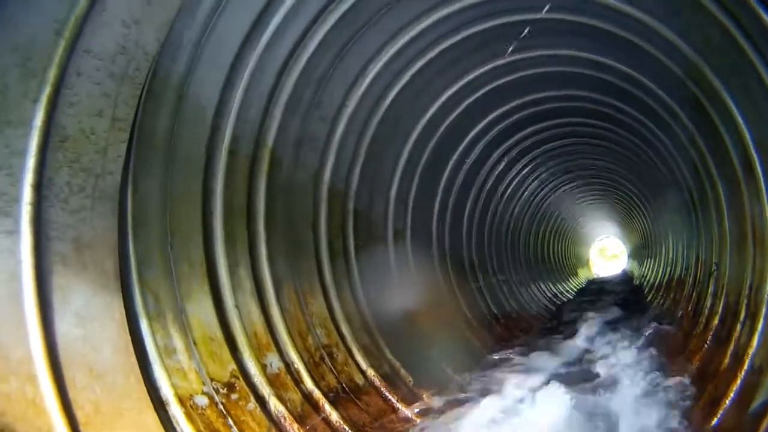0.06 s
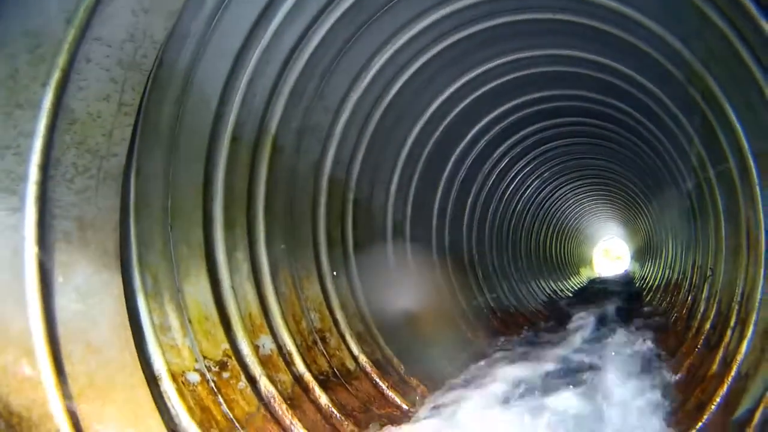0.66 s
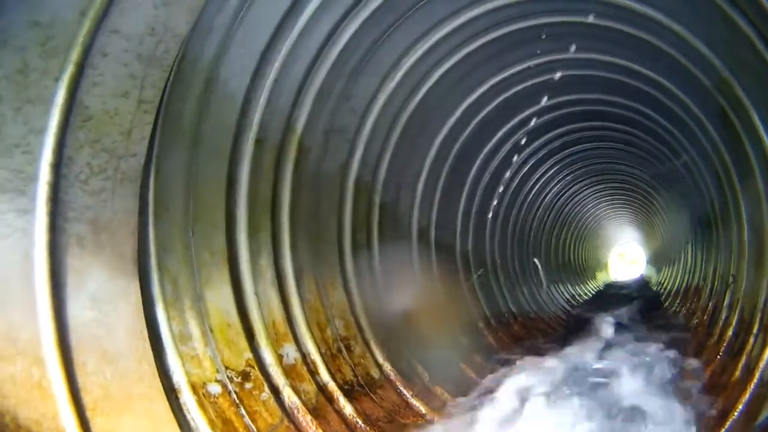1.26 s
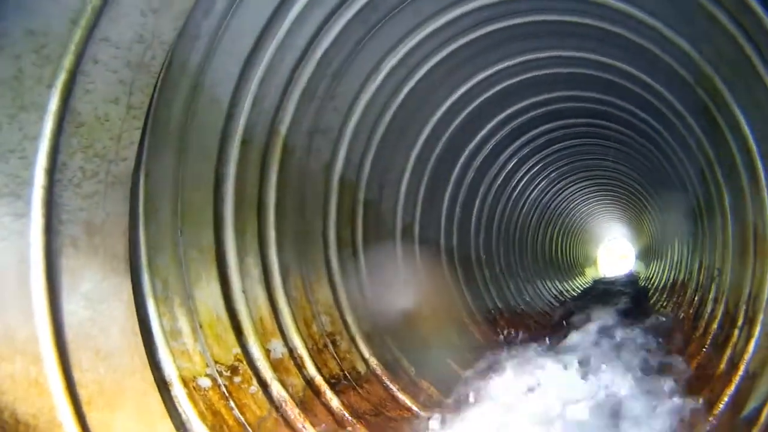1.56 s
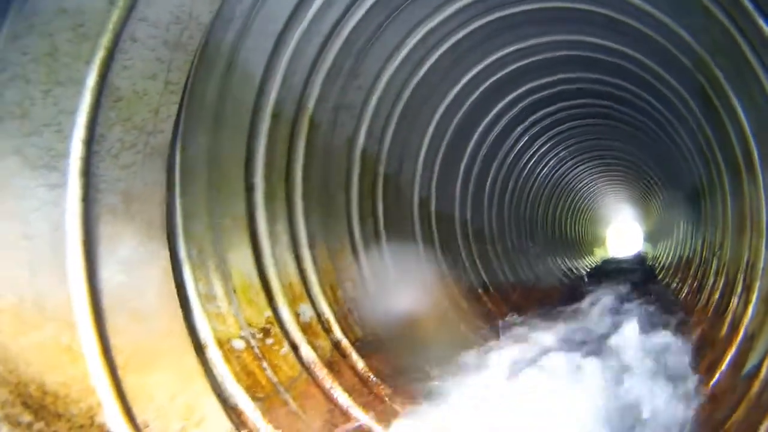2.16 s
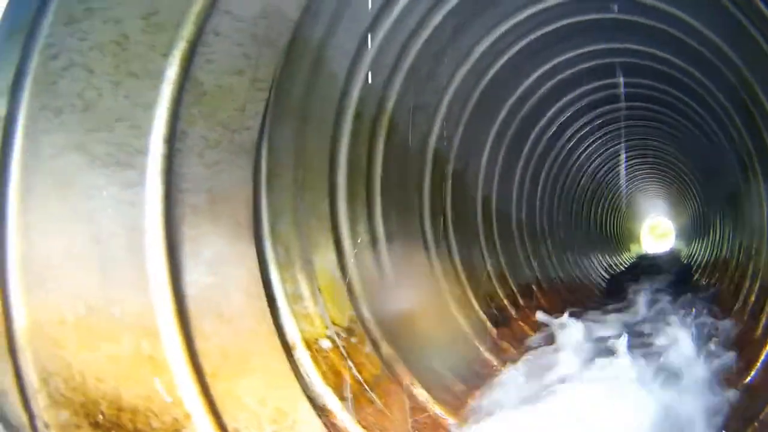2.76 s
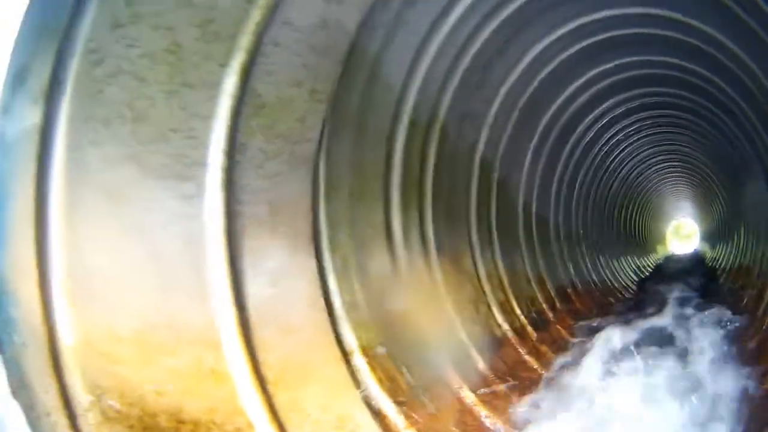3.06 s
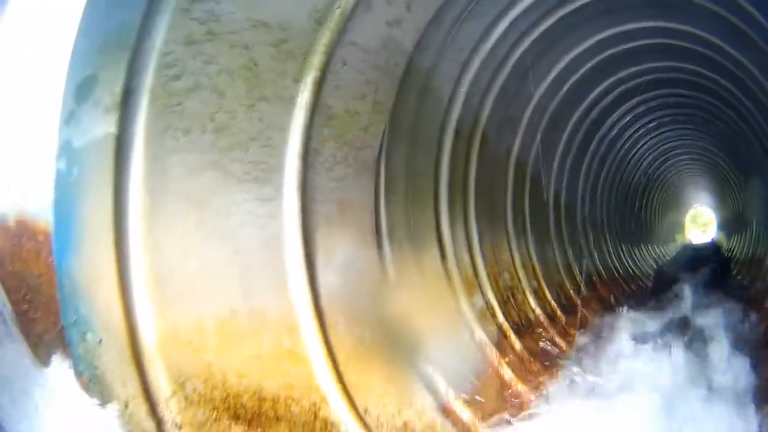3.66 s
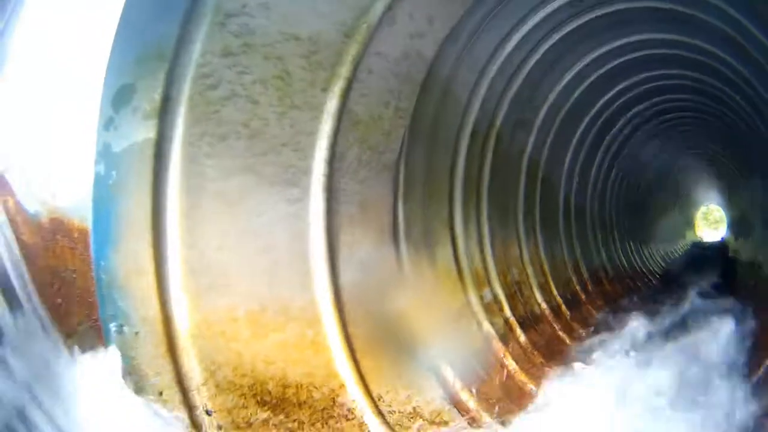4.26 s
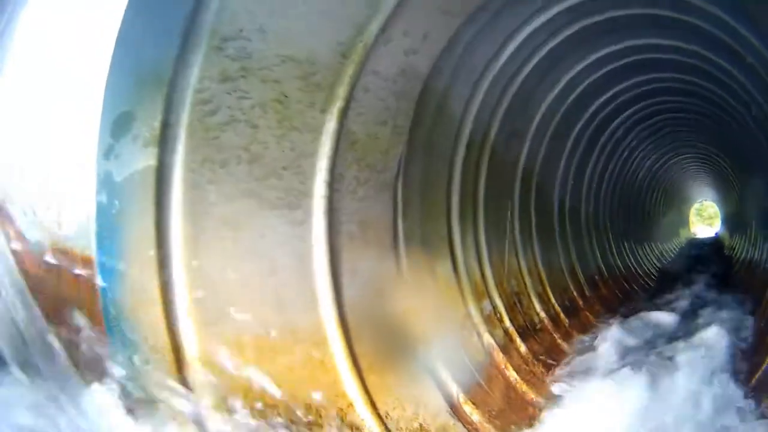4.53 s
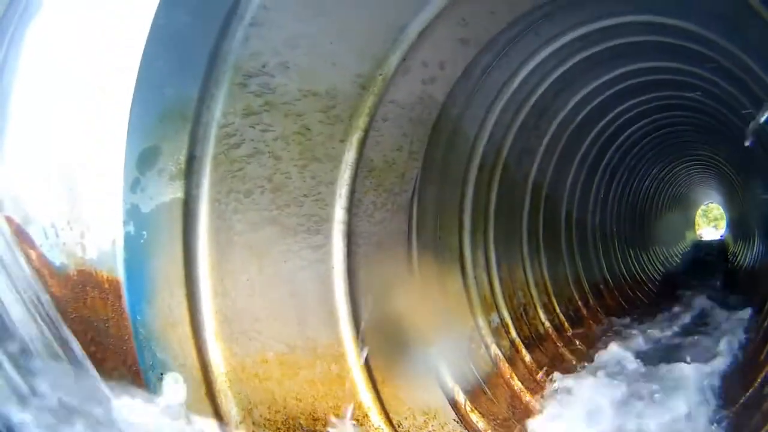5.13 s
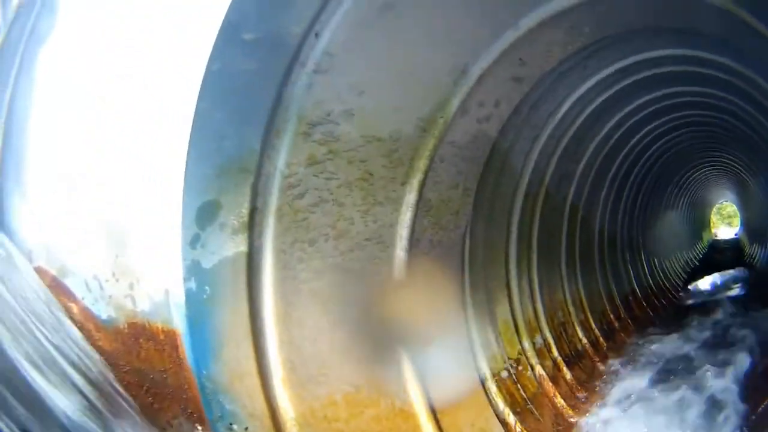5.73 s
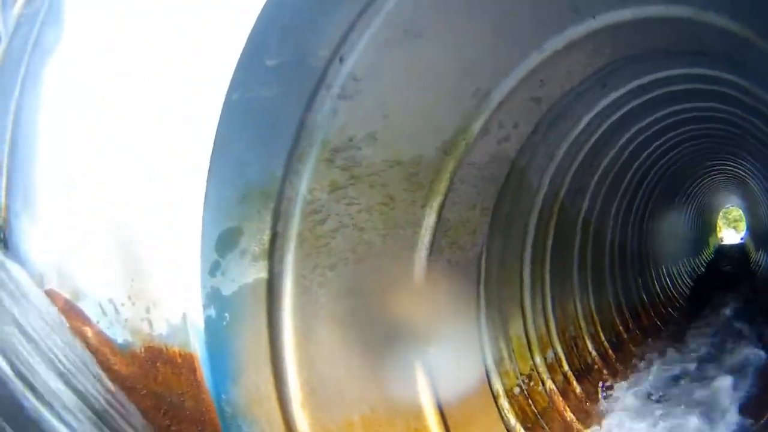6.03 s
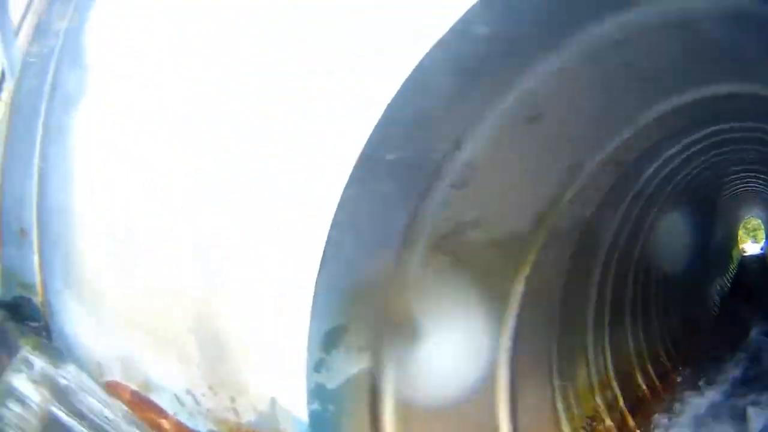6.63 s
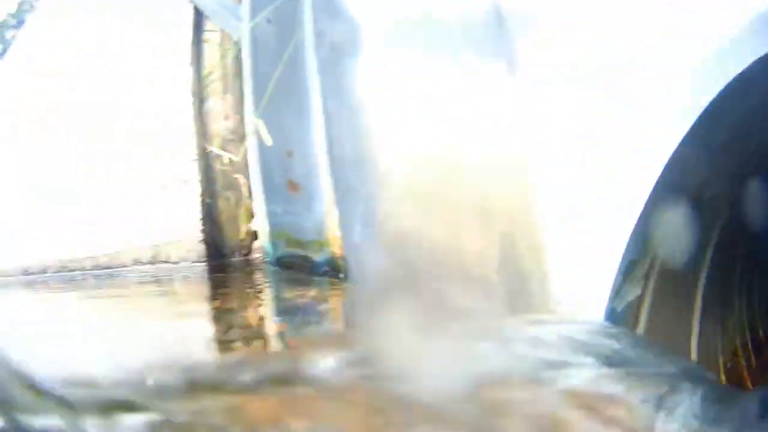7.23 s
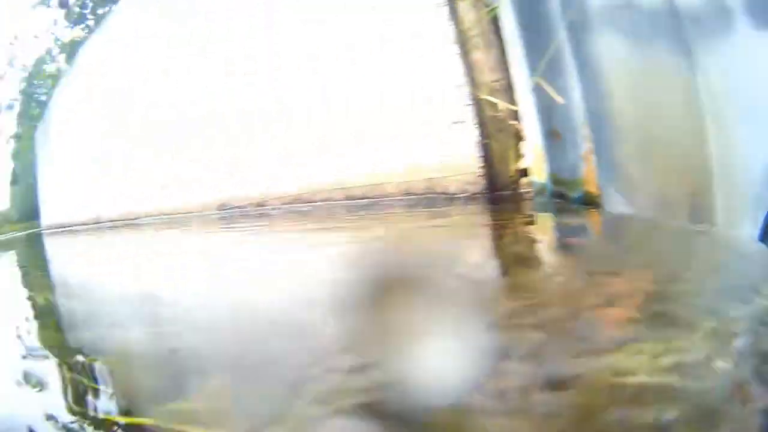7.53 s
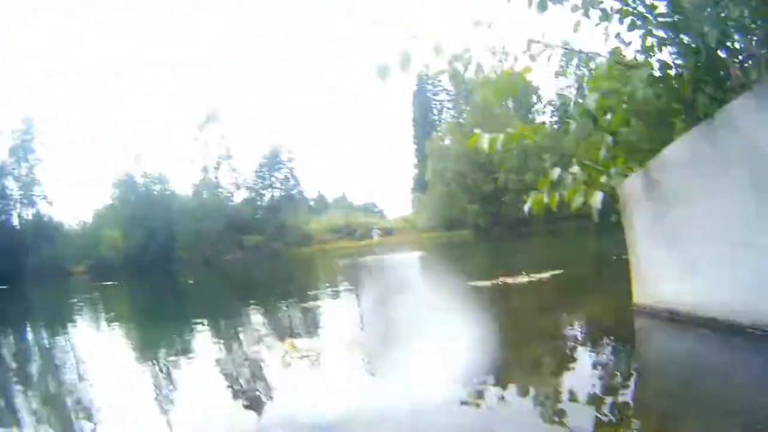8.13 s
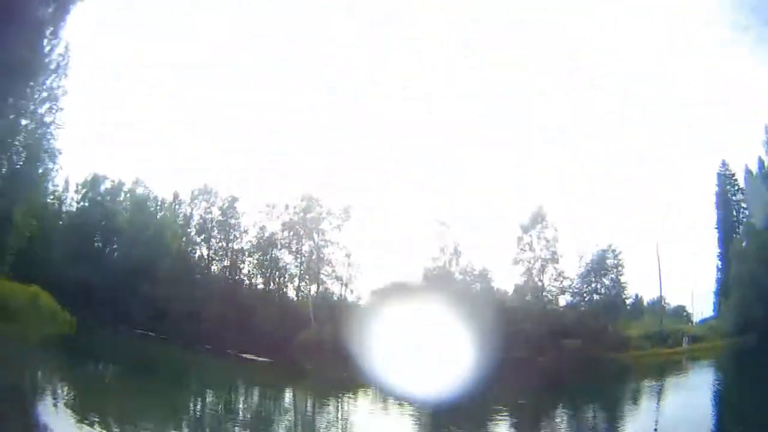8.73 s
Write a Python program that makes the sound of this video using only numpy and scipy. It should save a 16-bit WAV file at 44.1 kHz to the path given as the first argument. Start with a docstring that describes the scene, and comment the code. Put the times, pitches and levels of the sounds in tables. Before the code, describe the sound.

Heard close up at the mouth of a drain pipe outdoors, a steady, fizzing rush of water is dotted with drips ticking on the camera case. Falling water then slops and crackles over the microphone, with sharp pops and pinging bubbles. The splashing eases and gives way to short gulps and burbles in a pond. Finally the flow sounds far away, leaving dull finger taps and a faint handling rumble.

```python
"""Water rushes out of a corrugated metal culvert (a drain pipe) into a pond: countless tiny bubbles ring.
Drops tap the case of a small waterproof camera held at the pipe's mouth. It moves into the falling
water, where spray and bubbles burst right at the microphone and overload it. Then it dips through
the gurgling pond surface and turns away from the rush, while fingers knock on the case."""
import sys
import numpy as np
from scipy import signal
from scipy.fft import rfft, irfft, next_fast_len
from scipy.io import wavfile

SR = 44100
rng = np.random.default_rng(int(sys.argv[2]) if len(sys.argv) > 2 else 0)


def digitize_waveform(pressure):
    """Quantize a signal to 16-bit integers and store it at the path in sys.argv[1].

    Rows of a 2-D input are taken as channels; values are limited to [-1, 1].
    """
    field = np.atleast_2d(pressure).T
    bounded = np.clip(field, -1, 1)
    quanta = np.round(bounded * 32767).astype(np.int16)
    wavfile.write(sys.argv[1], SR, quanta)


N = 387638

# Levels in all tables are relative. A "colour" says how strong each pitch is.
# water slops against the case: t/s, length/s, spray level/dB, burble level/dB, burble f/Hz
SLOPS = [(3.522, 0.12, -42, -37.5, 2350), (3.67, 0.029, -39, -45, 2600), (3.897, 0.043, -31, -32, 3030),
         (3.959, 0.066, -27.5, -28, 2240), (4.109, 0.13, -36.5, -40, 4400), (4.374, 0.037, -33, -29, 2900),
         (4.419, 0.035, -34.5, -31, 4130), (4.474, 0.045, -31.5, -25, 2100), (4.544, 0.042, -34, -28, 2280),
         (4.635, 0.028, -31, -25.5, 2310), (4.684, 0.026, -42, -36, 2160), (4.733, 0.11, -45, -30, 2780),
         (4.862, 0.0064, -34.5, -27, 2360), (5.012, 0.0073, -47, -26, 1820),
         (5.058, 0.017, -52, -29.5, 1970), (5.105, 0.022, -32.5, -30, 2020),
         (5.147, 0.051, -39.5, -32, 1890), (5.236, 0.075, -36, -36, 2390), (5.321, 0.036, -42, -26.5, 2910),
         (5.616, 0.045, -31.5, -44, 3860), (5.738, 0.02, -35.5, -29, 3000),
         (5.887, 0.24, -43.5, -35.5, 1970)]
# the notes the case rings with: f/Hz, level/dB, time to fade by 60 dB/s
CASE_NOTES = [(401, 5, 0.063), (497, 3, 0.038), (703, 11, 0.043), (767, 3.5, 0.024), (954, 6, 0.02),
              (1520, -3.5, 0.044)]
# fine spray: f/Hz, level/dB
SPRAY_COLOUR = [(3000, 6), (4200, 5), (5400, 4.5), (6800, 1), (8500, -18.5), (11000, -35), (14000, -39)]
# small pinging bubbles: f/Hz, level/dB
PING_COLOUR = [(3900, 5.5), (5200, -3), (6400, -2), (7400, -1), (9000, -24)]


def culvert():
    """Countless far bubbles merge into a rush with a fine fizz, over the low churn of the stream."""
    # water in the pipe: t/s, rush level/dB, churn level/dB
    flow = [(0.0, -33.5, -54), (1.56, -33, -53), (2.19, -33.5, -55.5), (3.43, -34, -52), (4.02, -28.5, -43),
            (5.21, -29.5, -45.5), (6.16, -33, -48.5), (6.77, -35, -56.5), (7.04, -34.5, -54),
            (7.21, -36.5, -42.5), (7.46, -37, -52), (7.7, -43, -54), (7.92, -46.5, -64.5),
            (8.2, -53.5, -64.5), (8.6, -83, -73), (8.75, -46.5, -52)]
    # the bright rush: f/Hz, level/dB
    rush_colour = [(1100, -25.5), (1500, 7), (1900, -0.5), (2300, -0.5), (2650, 13.5), (3150, -11),
                   (3900, 10.5), (5000, 0), (6800, 0), (8500, -10.5), (11000, -17.5), (14500, -86)]
    # the low churn: f/Hz, level/dB
    churn_colour = [(150, -17), (280, -9), (420, -2), (550, -3), (750, 3), (1100, 9.5), (1500, 13.5),
                    (2200, -45.5)]
    rush_db, churn_db = in_time(flow)
    rush = restless_noise(rush_colour, surge_db=1.02, flicker_db=1.43, flicker_hz=23)
    fizz = bubble_cloud(SPRAY_COLOUR, per_s=1500, cycles=11.8, size_db=5, clump_db=1.5, pitches=16)
    churn = restless_noise(churn_colour, surge_db=-1.5, flicker_db=3, flicker_hz=15)
    return from_db(rush_db - 5) * rush + from_db(rush_db - 11.5) * fizz + from_db(churn_db + 3) * churn


def falling_water():
    """Each slop of water breaks into sizzle, crackle, a few pings and a burble of larger bubbles."""
    # bursting spray: f/Hz, level/dB
    crackle_colour = [(2500, 13), (5000, 0), (7000, -17), (9000, -11), (12500, -12.5)]
    rise_s = 0.021
    spray_gain, burble_gain = swells([row[:-1] for row in SLOPS], rise_s, fade_s=0.0024)
    sizzle = bubble_cloud(SPRAY_COLOUR, per_s=950, cycles=25, size_db=5, clump_db=5, pitches=36)
    crackle = bubble_cloud(crackle_colour, per_s=600, cycles=10, size_db=4.5, clump_db=4, pitches=16)
    pings = bubble_cloud(PING_COLOUR, per_s=300, cycles=20, size_db=3, clump_db=2, pitches=24)
    spray = from_db(-1.5) * sizzle + from_db(-5.5) * crackle + pings
    return spray_gain * spray + from_db(-7) * burble_gain * slop_burble(rise_s)


def slop_burble(rise_s, per_s=380, cycles=23, pitch_spread=0.157):
    """Larger bubbles ring at random pitches close to that of the latest slop."""
    slop_times, *_, slop_hz = np.transpose(SLOPS)
    births = np.flatnonzero(rng.random(N) < per_s / SR)
    scatter, size_db, phases = rng.standard_normal((N, 3))[births].T
    latest = np.maximum(np.searchsorted(slop_times - rise_s, births / SR) - 1, 0)
    bubble_hz = slop_hz[latest] * np.exp(pitch_spread * scatter)
    out, t = np.zeros(N + SR), np.arange(SR // 60) / SR
    for i, hz, gain, phase in zip(births, bubble_hz, from_db(size_db), phases):
        age = np.log(1000) * hz * t / cycles
        tone = np.cos(2 * np.pi * (hz * t + phase))
        out[i:i + len(t)] += gain * np.sqrt(hz) * age * np.exp(-age) * tone
    return rms_one(out[:N])


def near_bubbles(pitch_rise=0.0077, fizz_gain=0.26, fizz_fade_s=0.00078):
    """A bubble rings for a moment, rising in pitch as it surfaces; its torn skin fizzes."""
    # single close bubbles: t/s, level/dB, f/Hz, fade time/s
    bubbles = [(3.9, -16.5, 4140, 0.00078), (3.9588, -22, 5100, .0008), (3.963, -21, 3720, .0008),
               (3.973, -18, 1780, 0.00077), (3.979, -16, 4960, .0008), (3.984, -10.5, 4920, 0.0016),
               (3.9949, -3.5, 5000, 0.00045), (4.015, -5, 5260, 0.00093), (4.0832, 7, 2708, 0.0008),
               (4.088, -6.5, 3100, 0.00052), (4.0936, 4, 5100, 0.00022), (4.243, -20, 4300, 0.0013),
               (4.374, -9, 3700, 0.00031), (4.392, -21.5, 2710, .0018), (4.398, -23, 4960, .0007),
               (4.4208, -10.5, 5500, 0.00067), (4.443, -18, 4130, .0008), (4.451, -19, 4030, 0.00076),
               (4.48, -22, 1450, 0.0062), (4.48, -19, 5350, .0005), (4.487, -14, 2410, 0.00043),
               (4.4957, -18, 4800, .0005), (4.5, -14, 5100, 0.00087), (4.507, -11.5, 5050, 0.00061),
               (4.529, -14.5, 6530, 0.0014), (4.5302, -15, 4690, .0007), (4.639, -19, 4820, .0007),
               (4.6432, -18, 4150, .0012), (4.653, -20, 5700, .0007), (4.67, -20, 5650, .0007),
               (4.6848, -8.5, 5200, 0.00025), (4.696, -35.5, 650, 0.0043), (4.697, -19, 4960, .0006),
               (4.7074, -13.5, 5480, 0.0013), (4.7727, -15.5, 6200, 0.00066), (4.792, -16.5, 4540, 0.00081),
               (4.859, -23, 2110, 0.0018), (4.8624, -19.5, 5700, 0.0012), (4.8956, -19, 4060, 0.00054),
               (4.9607, -17.5, 6720, 0.0013), (5.0183, -20.5, 7140, 0.00052), (5.0185, -27, 1920, 0.0016),
               (5.0563, -23, 5730, 0.00056), (5.065, -20, 5370, .0007), (5.0753, -14.5, 5080, 0.00041),
               (5.099, -23, 7100, 0.00081), (5.1, -22.5, 2110, 0.0021), (5.112, -15.5, 5330, .001),
               (5.119, -17, 5500, 0.0012), (5.145, -20, 6350, 0.0017), (5.159, -18, 5620, 0.0021),
               (5.161, -25, 2030, .0015), (5.188, -19, 5330, .0007), (5.199, -21, 4120, 0.00085),
               (5.219, -14.5, 5430, 0.0014), (5.233, -19.5, 2180, 0.0016), (5.25, -16.5, 2280, 0.0015),
               (5.2505, -20, 6770, 0.0011), (5.2613, -15.5, 5840, 0.00064), (5.2806, -12.5, 5130, 0.00098),
               (5.5544, -6.5, 1866, 0.0014), (5.563, -8, 2700, 0.00037), (5.608, -15, 6340, .0006),
               (5.616, -8.5, 5140, 0.00052), (5.64, -16, 5100, .0007), (5.9758, -20.5, 2600, 0.0019),
               (6.028, -18, 3900, 0.00074), (6.9755, -20, 4430, 0.00079), (7.0175, 6.5, 5710, 0.00058),
               (7.026, -28, 2170, .004), (7.086, -27, 1960, .002), (7.093, -8, 5000, 0.00011),
               (7.0937, -21, 2900, 0.00066), (7.13, -25, 2110, 0.0023), (7.143, -30, 1590, 0.0025),
               (7.148, -13.5, 4430, 0.00016), (7.164, -28, 2150, .002), (7.168, -29, 1810, 0.0026),
               (7.206, -29, 1154, 0.0055), (7.2478, -15, 1730, 0.0026), (7.26, -30, 688, .004),
               (7.271, -19.5, 4340, 0.0021), (7.275, -21.5, 1670, .002), (7.279, -30, 1030, 0.0037),
               (7.312, -26.5, 2370, .0012), (7.33, -30, 1470, .004), (7.4118, -16, 6240, 0.00078),
               (7.437, -17, 5470, 0.0008), (7.507, -28.5, 2020, 0.0034), (7.5395, -29, 7400, 0.00058),
               (7.5585, -21.5, 4750, 0.00059), (7.611, -33, 1930, .002), (7.62, -26.5, 6420, 0.0012),
               (7.6682, -24, 1520, 0.0018), (7.719, -21, 1930, 0.0044), (7.7418, -19, 1890, 0.0026),
               (7.757, -27, 2000, .0015), (7.759, -20, 4400, 0.00062), (7.767, -16, 1490, 0.0022),
               (7.7692, -17, 2450, 0.00096), (7.7804, -12, 4770, 0.0015), (7.793, -18, 4960, 0.00053),
               (7.805, -18.5, 1520, 0.0018), (7.805, -15.5, 4700, 0.0013), (7.807, -26, 2110, .002),
               (7.811, -31, 994, .004), (7.834, -33, 1080, 0.0023), (7.8333, -28, 3300, 0.0016)]
    out, t = np.zeros(N), np.arange(SR // 30) / SR
    for start_s, level_db, hz, fade_s in bubbles:
        age, fizz_age, i = t / fade_s, t / fizz_fade_s, int(start_s * SR)
        glide = 1 + pitch_rise * (age / 2 - 1.5)
        ping = age * np.exp(1 - age) * np.sin(2 * np.pi * hz * t * glide)
        around_hz = hz / 1.426, hz * 1.426
        hiss = band(band(rng.standard_normal(len(t)), *around_hz), *around_hz)
        fizz = fizz_age * np.exp(1 - fizz_age) * rms_one(hiss)
        out[i:i + len(t)] += from_db(level_db) * (ping + fizz_gain * fizz)
    return out


def pond():
    """Each gulp traps air: small bubbles spit, larger ones burble, the largest glug."""
    # the case dips in: t/s, length/s, spray level/dB, burble level/dB, glug level/dB
    gulps = [(7.085, 0.076, -36.5, -34, -36), (7.195, 0.049, -38.5, -31.5, -33),
             (7.25, 0.034, -46, -29, -34), (7.31, 0.11, -58, -43, -42.5), (7.56, 0.038, -42.5, -41, -47),
             (7.67, 0.026, -42, -33.5, -47), (7.712, 0.098, -38.5, -31.5, -51),
             (7.768, 0.013, -31.5, -28, -41), (7.806, 0.0054, -55, -37, -24)]
    # middle-sized bubbles: f/Hz, level/dB
    burble_colour = [(1350, -5), (1750, 0), (2100, -1.5), (2450, -6), (2900, -7)]
    # the largest bubbles: f/Hz, level/dB
    glug_colour = [(620, 3.5), (800, -11.5), (1100, 7), (1400, -1.5)]
    spray, burble, glug = swells(gulps, rise_s=0.019, fade_s=0.016)
    small = bubble_cloud(PING_COLOUR, per_s=220, cycles=11, size_db=0.5, clump_db=-1.5, pitches=24)
    middle = bubble_cloud(burble_colour, per_s=230, cycles=21, size_db=2, clump_db=1.5, pitches=20)
    large = bubble_cloud(glug_colour, per_s=150, cycles=14.6, size_db=1.5, clump_db=2, pitches=18)
    return from_db(-2) * spray * small + from_db(-4) * burble * middle + from_db(-2) * glug * large


def drops():
    """A drop flattens on the case and splats, with a dull low thump and a hollow ring; the hardest one
    overloads the microphone into a heavy thump."""
    # drops landing: t/s, splat level/dB, thud level/dB
    landings = [(0.059, -17, -61), (0.1519, -12, -60), (0.6613, -14.5, -46), (0.6657, -8.5, -59),
                (0.7798, -20.5, -61), (0.993, -15, -49), (1.427, -37, -43), (2.726, -20, -42),
                (2.76, -19, -56), (2.7739, -8.5, -57), (2.851, -20, -49), (3.985, -8, -36),
                (3.9926, -9.5, -47), (4.0095, -19, -44), (4.0164, -9.5, -47), (4.083, -5, -15),
                (7.0097, -15.5, -46), (7.018, 0, -42)]
    # the low thump: f/Hz, level/dB, time to fade by 60 dB/s
    thump_notes = [(76.6, 1.5, 0.026), (124, 6.5, 0.019), (224, 10, 0.004)]
    times, splat_db, thud_db = np.transpose(landings)
    push = bursts(times, splat_db, fade_s=0.0021)
    push = signal.lfilter(*signal.butter(1, 400, fs=SR), push)  # soften each start
    splat = from_db(-6) * push * rms_one(band(noise(1120, 7100), 510, 8200))
    pat = from_db(-20) * push * noise(330, 2300)
    thump = strike(times, thud_db - 0.5, thump_notes)
    return mic_port(splat + pat) + thump + strike(times, splat_db - 54, CASE_NOTES)


def spits():
    """Under the falling water, droplets keep bursting close by in short, separate spits."""
    # how loud they are: t/s, level/dB
    spitting = [(3.3, -80), (3.9, -41), (4.28, -49), (4.45, -38), (4.95, -40.5), (5.15, -38), (5.45, -43),
                (6.05, -44), (6.3, -80)]
    # their pitches: f/Hz, level/dB
    spit_colour = [(3600, -2), (5500, 1), (6800, 0.5), (8500, -8.5)]
    droplets = bubble_cloud(spit_colour, per_s=90, cycles=11, size_db=2.5, clump_db=3, pitches=12)
    return from_db(in_time(spitting)[0]) * droplets


def specks():
    """Specks of spray hit the microphone opening with tiny bright ticks."""
    # the hits: t/s, level/dB
    hits = [(3.533, -26.5), (4.0823, -7.5), (4.1941, -21), (4.4196, -22), (4.4685, -27), (4.8144, -23),
            (5.2617, -32), (5.55, -15.5), (5.8244, -23.5), (5.9113, -21), (7.017, -17), (7.6657, -23.5)]
    times, levels_db = np.transpose(hits)
    return bursts(times, levels_db - 6.5, fade_s=0.0045) * noise(4500, 9500)


def fingers(slip_count=7, creep_s=(8.43, 8.75), soft_hz=2450):
    """Soft fingers knock and creep on the case with dull, hollow taps; a fingernail scrapes it once with a
    rasp."""
    # finger knocks: t/s, knock level/dB, tick level/dB
    knocks = [(0.121, -57.5, -53), (1.41, -68, -61), (1.445, -67, -63), (7.488, -51.5, -49),
              (7.568, -62, -62), (7.655, -62, -45), (7.862, -60, -55), (7.962, -71, -72),
              (7.999, -56.5, -66), (8.115, -74, -71), (8.218, -56.5, -53.5), (8.258, -57.5, -60),
              (8.284, -60, -72), (8.346, -56, -48), (8.373, -59, -64), (8.431, -55, -50),
              (8.449, -60.5, -66), (8.492, -55.5, -56), (8.512, -49, -47), (8.518, -45, -60),
              (8.554, -63, -64), (8.568, -63, -70), (8.582, -72, -65), (8.601, -67, -67), (8.665, -63, -68),
              (8.677, -68, -66), (8.709, -61, -64)]
    # the higher notes of the case: f/Hz, level/dB, time to fade by 60 dB/s
    tick_notes = [(2020, 2.4, 0.0092), (2156, 2.8, 0.012)]
    slips = [(rng.uniform(*creep_s), db, db - 6.5) for db in rng.normal(-71, 3.5, slip_count)]
    times, knock_db, tick_db = np.transpose(list(knocks) + slips)
    taps = strike(times, knock_db + 10, CASE_NOTES) + strike(times, tick_db + 19, tick_notes)
    scuff = bursts(times, knock_db + 10.5, fade_s=0.0033) * noise(270, 2900)
    rasp = bursts(times=np.array([8.508]), levels_db=-35.5, fade_s=0.0083) * noise(3950, 5040)
    return band(cut_treble(taps + scuff, soft_hz), 250, 6000) + rasp


def hand_rumble(steady_db=-73.5, tremble_db=2):
    """The hand trembles faintly, and the case rumbles more at each shift of the grip."""
    # shifts of the grip: t/s, length/s, level/dB
    grips = [(0.023, 0.08, -61), (0.136, 0.086, -57), (0.66, 0.04, -49), (1.417, 0.05, -66),
             (2.48, 0.063, -60), (2.787, 0.12, -57), (3.515, 0.054, -59), (4.103, 0.071, -54),
             (4.41, 0.18, -67), (4.925, 0.045, -56), (5.528, 0.046, -60), (7.022, 0.029, -40.5),
             (7.408, 0.045, -57), (7.534, 0.09, -51.5), (7.805, 0.064, -53), (7.99, 0.11, -58),
             (8.246, 0.1, -53), (8.376, 0.083, -61), (8.547, 0.095, -54), (8.738, 0.054, -45.5)]
    # the rumble: f/Hz, level/dB
    rumble_colour = [(25, 10), (50, -10.5), (80, -1.5), (125, -1), (160, -9.5), (220, -19.5), (320, -11)]
    t = np.arange(0, N, 20) / SR
    shifts = sum(from_db(db) / (1 + (2 * (t - at_s) / length_s) ** 4) for at_s, length_s, db in grips)
    tremble = from_db(steady_db + tremble_db * drift(7.4))
    gain = in_time(np.column_stack([t, shifts]))[0] + tremble
    shared = restless_noise(rumble_colour, surge_db=-0.5, flicker_db=4, flicker_hz=10)
    opposed = restless_noise(rumble_colour, surge_db=-0.5, flicker_db=4, flicker_hz=10)
    left_right = shared * from_db([[-1.5], [1.5]]) + 0.95 * opposed * [[1], [-1]]
    return from_db(0.5) * gain * left_right


def far_rush():
    """With the camera turned away from the pipe, the rush is a far-off, hollow hiss."""
    # how loud it is: t/s, level/dB
    loudness = [(7.5, -80), (7.95, -60.5), (8.35, -54.5), (8.75, -56.5)]
    # the bands it rings in: f/Hz, width/Hz, level/dB
    hollow_bands = [(1570, 260, -5.5), (2170, 180, -3.5), (2720, 690, -1.5), (3590, 520, -1),
                    (4960, 850, -0.5), (6000, 4200, -3.5), (6700, 450, -9)]
    hiss = 0
    for hz, width_hz, level_db in hollow_bands:
        peak = signal.iirpeak(hz, hz / width_hz, fs=SR)
        ringing = signal.lfilter(*peak, signal.lfilter(*peak, rng.standard_normal(N)))
        hiss = hiss + from_db(level_db) * rms_one(ringing)
    return from_db(in_time(loudness)[0]) * rms_one(hiss)


def mic_port(x, depth=1):
    """The small hollow in front of the microphone makes some pitches louder and others softer."""
    # the bands it changes: f/Hz, width/Hz, level change at full depth/dB
    port_bands = [(370, 37, 3.5), (698, 59, 5), (1198, 690, -9.5), (1450, 26, 4.5), (1877, 170, 6),
                  (2110, 81, 5.5), (2480, 44, 1.5), (2600, 130, 3.5), (3146, 324, -3), (3590, 200, -1),
                  (4350, 180, -9.5), (4825, 170, 2), (5100, 205, 7.5), (6730, 990, 2.5), (7300, 340, -5.5),
                  (8430, 280, 4.5)]
    for hz, width_hz, change_db in port_bands:
        ringing = signal.lfilter(*signal.iirpeak(hz, hz / width_hz, fs=SR), x + 1e-18)
        x = x + (from_db(depth * change_db) - 1) * ringing
    return x


def bubble_cloud(colour, per_s, cycles, size_db, clump_db, pitches):
    """Bubbles of random size and pitch are born in clumps; each rings for about `cycles` vibrations."""
    births = np.flatnonzero(rng.random(N) < per_s * from_db(clump_db * drift(35)) / SR)
    sizes = from_db(size_db * np.minimum(rng.exponential(1, N)[births], 3))
    sizes *= rng.choice([-1, 1], N)[births]
    pitch_index = rng.integers(0, pitches, N)[births]
    out = np.zeros(N + SR)
    for k, hz in enumerate(np.geomspace(colour[0][0], colour[-1][0], pitches)):
        t = np.arange(int(1.5 * cycles / hz * SR)) / SR
        shape = t * np.exp(-np.log(1000) * hz * t / cycles)
        # hz squared makes up for the shorter life of small bubbles
        ping = from_db(at_hz(colour, hz)) * hz ** 2 * shape * np.cos(2 * np.pi * hz * t)
        for i, size in zip(births[pitch_index == k], sizes[pitch_index == k]):
            out[i:i + len(t)] += size * ping
    return rms_one(out[:N])


def restless_noise(colour, surge_db, flicker_db, flicker_hz):
    """Narrow bands of noise surge together, and each also flickers on its own."""
    lowest, highest = colour[0][0], colour[-1][0]
    edges = np.geomspace(lowest, highest, 2 + int(3 * np.log2(highest / lowest)))
    white = rng.standard_normal((2, N))
    surge, out = surge_db * drift(6.5), 0
    for k, (low, high) in enumerate(zip(edges, edges[1:])):
        level_db = at_hz(colour, np.sqrt(low * high)) + surge + flicker_db * drift(flicker_hz)
        out = out + from_db(level_db) * band(white[k % 2], low, high)
    return rms_one(cut_treble(out, highest))


def strike(times, levels_db, notes):
    """Each blow sets all the notes ringing, each with a slightly random strength."""
    out = np.zeros(N)
    for k, (hz, note_db, ring_s) in enumerate(notes):
        blows = clicks(times, levels_db + note_db + rng.normal(0, 2, len(times)))
        fade, turn = np.exp(-np.log(1000) / (ring_s * SR)), 2 * np.pi * hz / SR  # per sample
        ringing = signal.lfilter([0, np.sin(turn)], [1, -2 * fade * np.cos(turn), fade ** 2], blows)
        out += (-1) ** k * ringing
    return out


def swells(rows, rise_s, fade_s):
    """Each row rises, holds and dies away; gives one loudness curve per level column."""
    t, power = np.arange(0, N, 20) / SR, 0
    for start_s, length_s, *levels_db in rows:
        rise = np.clip(1 + (t - start_s) / rise_s, 0, 1)
        fade = np.exp(-np.maximum(t - start_s - length_s, 0) / fade_s)
        power = power + np.outer(from_db(levels_db), rise * fade) ** 2
    return in_time(np.column_stack([t, *np.sqrt(power)]))


def bursts(times, levels_db, fade_s):
    """A loudness curve that jumps at each time and dies away."""
    return signal.lfilter([1], [1, -np.exp(-1 / (fade_s * SR))], clicks(times, levels_db))


def clicks(times, levels_db):
    """A one-sample click at each time."""
    out = np.zeros(N)
    out[(times * SR).astype(int)] = from_db(levels_db)
    return out + 1e-18


def drift(rate_hz, step=40):
    """A smooth random wobble, about 1 in size."""
    memory = np.exp(-2 * np.pi * rate_hz * step / SR)
    white = rng.standard_normal(N // step + 2002)
    slow = rms_one(signal.lfilter([1], [1, -2 * memory, memory ** 2], white)[2000:])
    return np.interp(np.arange(N) / step, np.arange(len(slow)), slow)


def noise(low_hz, high_hz):
    """Hiss between two pitches, at power 1."""
    return rms_one(band(rng.standard_normal(N), low_hz, high_hz))


def band(x, low_hz, high_hz):
    """Gently keep what lies between two pitches."""
    return signal.sosfilt(signal.butter(2, [low_hz, high_hz], "band", fs=SR, output="sos"), x + 1e-18)


def cut_treble(x, hz):
    """Steeply remove what lies above a pitch."""
    return signal.sosfilt(signal.butter(8, hz, fs=SR, output="sos"), x)


def in_time(rows):
    """Join a table's points in time: one curve per level column."""
    times, *columns = np.transpose(rows)
    return [np.interp(np.arange(N) / SR, times, column) for column in columns]


def at_hz(colour, hz):
    """Look up a colour's level at a pitch."""
    points_hz, levels_db = np.transpose(colour)
    return np.interp(np.log(hz), np.log(points_hz), levels_db)


def from_db(db):
    """Turn decibels into a multiplier."""
    return 10 ** (np.asarray(db) / 20)


def rms_one(x):
    """Scale to an average power of 1."""
    return x / np.sqrt(np.mean(x ** 2) + 1e-20)


def scene():
    """Water and taps are mostly louder on the left; the hand's rumble comes through the case."""
    # how much more the left side hears: f/Hz, left minus right level/dB
    left_lead = [(60, -11), (130, 0.5), (230, 10), (380, 6.5), (700, 9), (1300, 6.5), (4400, 6), (8100, 4),
                 (15000, -1.5)]
    rush = mic_port(culvert())
    splashes = mic_port(falling_water() + spits() + pond(), depth=0.83)  # a wet port colours less
    heard = rush + splashes + far_rush() + near_bubbles() + specks() + drops() + fingers()
    size = next_fast_len(N)
    hz = np.maximum(np.fft.rfftfreq(size, 1 / SR), 1)
    left_ratio = from_db(at_hz(left_lead, hz))
    right = rfft(heard, size) * 2 / (1 + left_ratio)
    return irfft(np.array([left_ratio * right, right]), size)[:, :N] + hand_rumble()


def record(dry, right_offset=0.021, limit=0.92, top_hz=15900):
    """The camera's right side sits a little off zero; loud peaks clip and the highest treble is cut."""
    clipped = np.clip(dry + [[0], [right_offset]], -limit, limit)
    return signal.sosfilt(signal.ellip(10, .1, 80, top_hz, fs=SR, output="sos"), clipped)


dry = scene()
out = record(dry)
digitize_waveform(out)
```